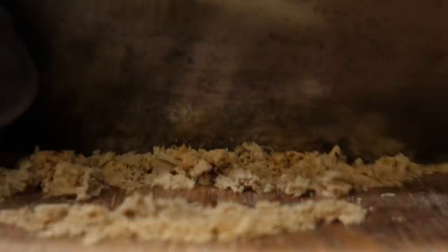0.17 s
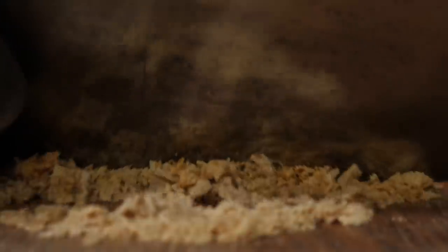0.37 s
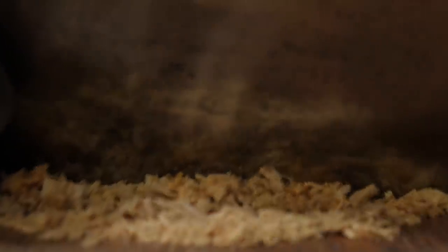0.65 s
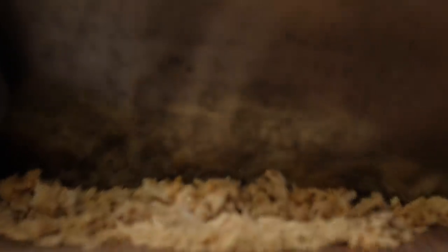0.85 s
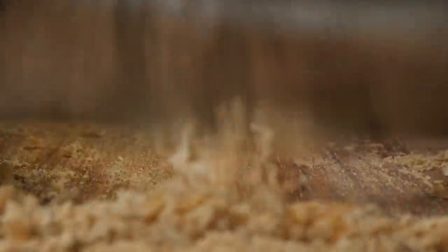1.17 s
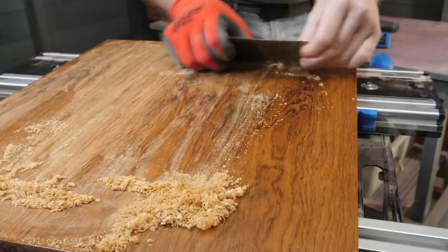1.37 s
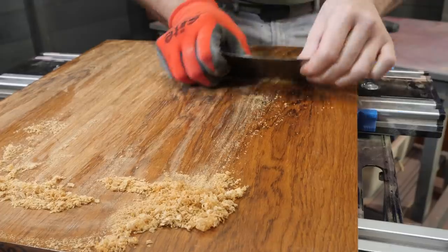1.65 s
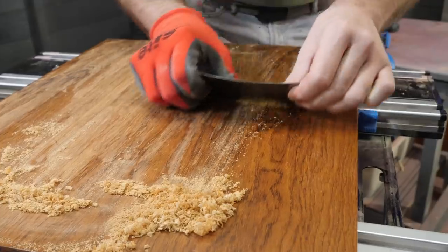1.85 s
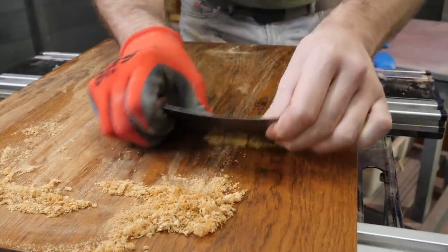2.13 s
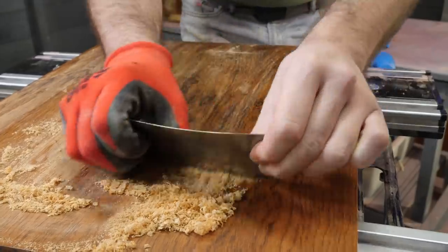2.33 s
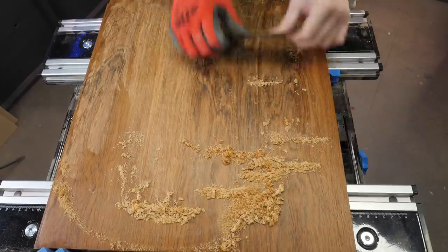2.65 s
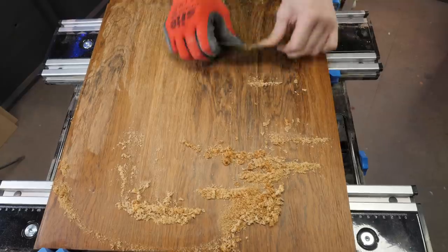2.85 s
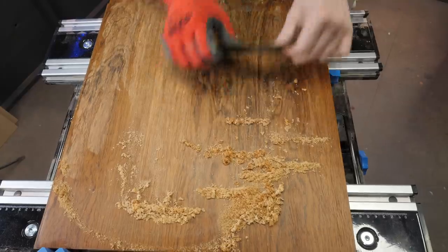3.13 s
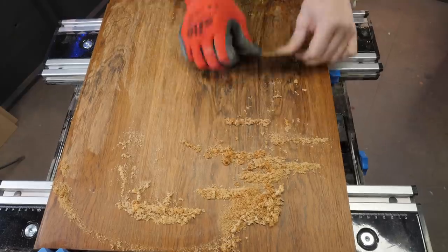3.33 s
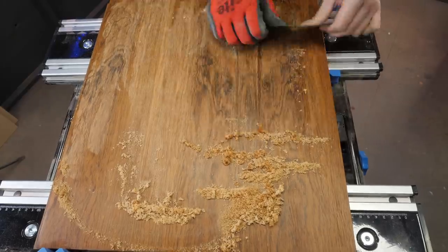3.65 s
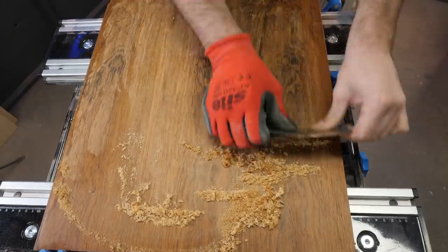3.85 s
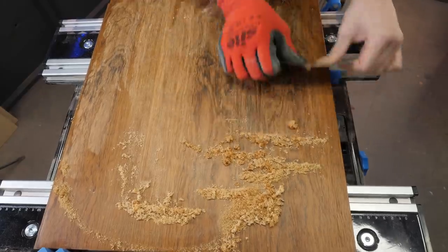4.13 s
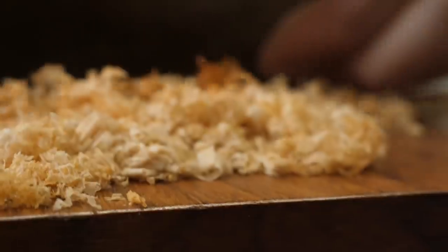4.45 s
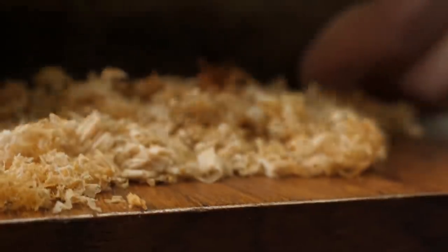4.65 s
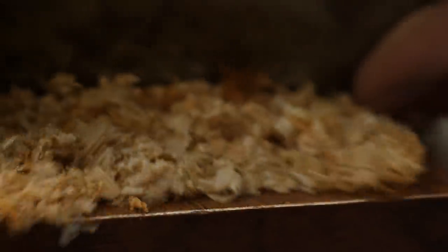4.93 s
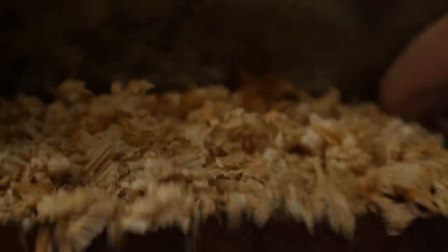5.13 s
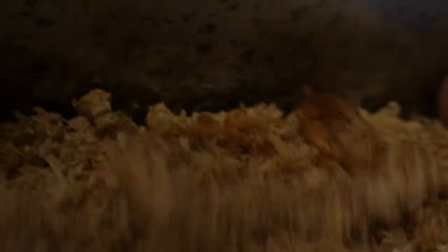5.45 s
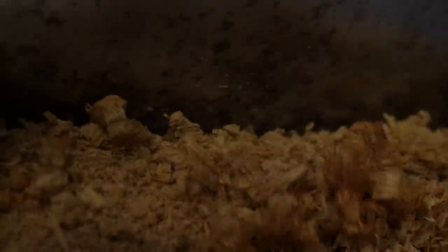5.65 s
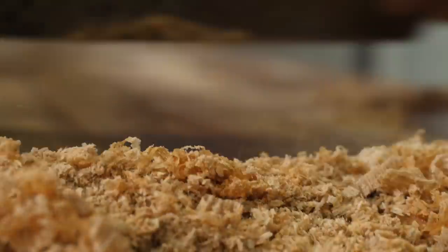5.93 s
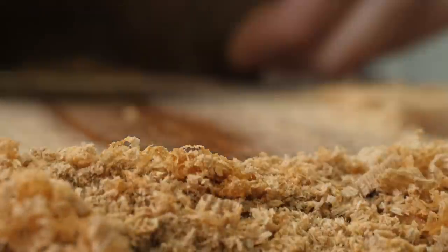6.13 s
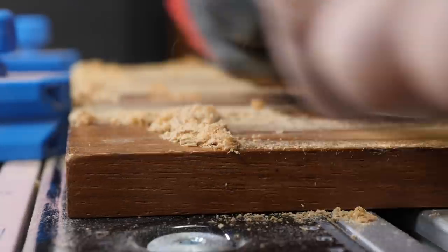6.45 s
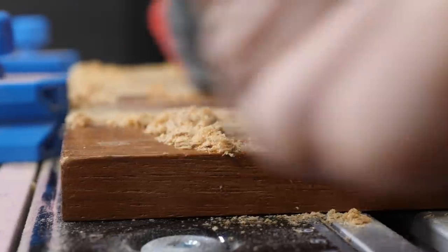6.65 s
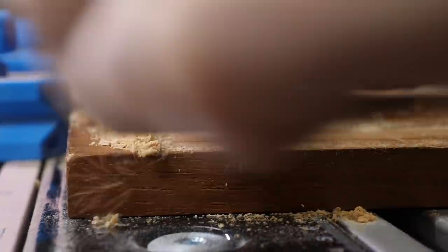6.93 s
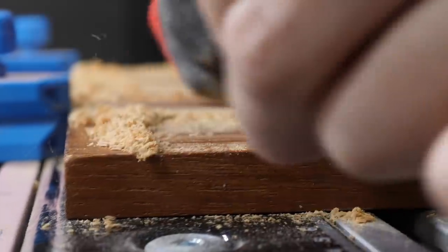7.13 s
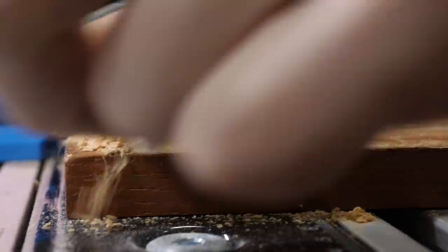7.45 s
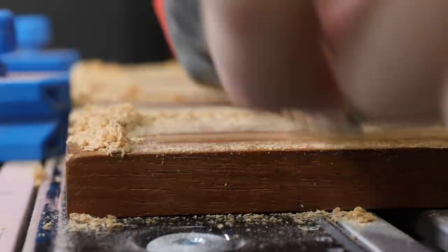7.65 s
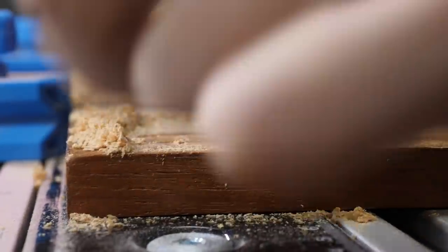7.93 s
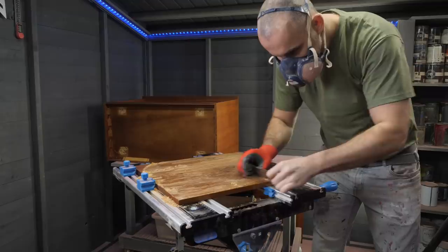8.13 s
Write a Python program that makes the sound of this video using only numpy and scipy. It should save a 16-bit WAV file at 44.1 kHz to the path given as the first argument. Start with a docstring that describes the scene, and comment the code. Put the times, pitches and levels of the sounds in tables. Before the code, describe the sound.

In a small workshop, a thin steel blade is dragged by hand across a clamped wooden panel. Close, metallic rasps stutter and catch at first, then comes one long, loud hissing stroke. Several lighter, drier quick strokes follow, smeared and slightly wide. Close ringing scrapes return over a low bench rumble, then spaced strokes, each led by a hard woody knock.

```python
"""A steel card scraper is drawn by hand along a clamped wooden panel: a dense rasp of tearing fibres, made of
flickering noise ringing in resonators, with catches that spray chips and gaps where the blade lifts.
Knocks of the blade are damped sines and noise bursts; the bench sways and drones as filtered noise.
Noise also makes the small workshop's air and the echo of its walls.
One channel is heard doubled; for a few quick strokes the two drift apart in phase."""
import sys
import numpy as np
from scipy import signal
from scipy.fft import rfft, irfft
from scipy.io import wavfile
from scipy.ndimage import uniform_filter1d, map_coordinates

SR = 44100
rng = np.random.default_rng(int(sys.argv[2]) if len(sys.argv) > 2 else 0)


def to_wav(s):
    """Save 16-bit WAV."""
    ch = np.atleast_2d(s).T  # columns
    pcm = np.round(np.clip(ch, -1, 1) * 32767)  # PCM
    wavfile.write(sys.argv[1], SR, pcm.astype(np.int16))


N = 365588


def amp(db):
    """Turns decibels into a gain."""
    return 10 ** (np.asarray(db) / 20)


def rms_one(x):
    """Levels a signal to an RMS of 1."""
    return x / np.sqrt(np.mean(x ** 2) + 1e-20)


def at_hz(points, hz):
    """Reads a curve of (frequency [Hz], value), interpolated over log frequency."""
    point_hz, values = np.array(points).T
    return np.interp(np.log(hz + 1), np.log(point_hz), values)


def in_time(rows, t):
    """Reads every column of a table whose first column is time [s]."""
    s, *columns = np.transpose(rows)
    return [np.interp(t, s, column) for column in columns]


def band(x, low_hz, high_hz, order=2):
    """Keeps the band between two frequencies."""
    return signal.sosfilt(signal.butter(order, [low_hz, high_hz], "band", fs=SR, output="sos"), x)


def coloured(x, spectrum):
    """Filters x with a spectrum of (frequency [Hz], level [dB per Hz])."""
    hz = np.arange(len(x) // 2 + 1) * SR / len(x)
    return irfft(rfft(x) * amp(at_hz(spectrum, hz)), len(x))


def drift(rate):
    """Slow chance at about `rate` changes a second, with an RMS of 1."""
    r = np.exp(-2 * np.pi * rate / SR)
    slow = signal.lfilter([1], [1, -2 * r, r * r], rng.standard_normal(N + SR))
    return rms_one(slow[SR:])   # the first second lets the filter settle


def resonance(x, hz, width_hz):
    """One resonance that rings at its own pitch, with a gain of 1 at its top."""
    r = np.exp(-np.pi * width_hz / SR)
    feedback = [1, -2 * r * np.cos(2 * np.pi * hz / SR), r * r]
    return signal.lfilter(np.array([1, 0, -1]) * (1 - r * r) / 2, feedback, x)


def tearing(grain_db):
    """Fibres break so densely that they merge to noise fluttering with the grain; two unrelated draws."""
    flutter_db = grain_db * drift(155) + 1.25 * drift(11.6)
    return rng.standard_normal((2, N)) * amp(flutter_db)


def patchy(x, depth_db):
    """Colour shifts in patches as the edge meets harder and softer grain."""
    _, _, z = signal.stft(x, SR, nperseg=512)
    patches = uniform_filter1d(rng.standard_normal(z.shape), size=5, axis=0)   # over frequency
    patches = uniform_filter1d(patches, size=24, axis=1)   # over time
    return signal.istft(z * amp(depth_db * rms_one(patches)), SR, nperseg=512)[1][:N]


def off_the_panel(x):
    """The panel mirrors the sound; the extra path changes as the blade travels, so the comb glides."""
    delay_ms = []   # shrinks along each stroke: (time [s], delay [ms])
    for *_, speed in STROKES:
        delay_ms += [(speed[0][0], 1.1), (speed[-1][0], 0.7)]
    delay, = in_time(delay_ms, np.arange(N) / SR)
    late = np.arange(N) - delay * SR / 1000
    return x + 0.13 * map_coordinates(x, [late], order=3, mode="nearest")


# Centres of the four layers, from low to high: wood, blade, shavings, edge hiss; (frequency [Hz])
LAYER_HZ = [500, 1900, 6000, 13000]


def layers(x):
    """Splits x into four overlapping layers by frequency, each levelled to an RMS of 1."""
    log_hz = np.log(np.arange(len(x) // 2 + 1) * SR / len(x) + 1)
    shares = [np.interp(log_hz, np.log(LAYER_HZ), row) for row in np.eye(4)]
    return [rms_one(irfft(rfft(x) * share, len(x))) for share in shares]


# Each way of holding and bending the blade: (start time [s], level of the room echo during this hold [dB],
# resonances as (frequency [Hz], width [Hz], level [dB]))
HOLDS = [ (0, -11, [(1173, 60, 1), (1556, 31, -1), (1760, 51, 4.5), (2310, 60, 4.5), (3180, 540, -2),
         (3720, 22, 4), (4360, 280, 0.5), (5840, 220, 3), (6500, 280, -1), (8470, 240, -0.5)]),
         (.78, -14, [(1130, 140, 2), (1470, 130, 1), (2420, 120, 5), (3360, 72, -4)]),
         (.97, -12, [(1600, 150, -1), (2470, 42, 11.5), (3280, 120, 6.5), (4900, 110, 2), (5800, 82, -4)]),
         (1.401, -12, [(1310, 160, -8), (1785, 79, -1.5), (2450, 220, -6), (2920, 82, 0), (3730, 260, -1.5),
         (4500, 88, 0.5), (5290, 230, -2), (6080, 120, 0.5), (8480, 1140, -2)]),
         (2.44, -24, [(1070, 410, -15), (2400, 160, -6.5), (5230, 960, -13), (8200, 580, -6.5),
         (13200, 1600, -8)]), (4.279, -10, [(1094, 120, -4.5), (1672, 85, 6.5), (2360, 54, 5.5),
         (2900, 50, 1.5), (3300, 73, -4), (3480, 71, -1), (5170, 140, -4.5), (5960, 180, -4),
         (8700, 400, -6)]), (5.14, -10.5, [(502, 27.4, 2), (1005, 75, -2.5), (2330, 45, -0.5),
         (2970, 190, -0.5), (4800, 130, -5.5), (5450, 100, -3), (6050, 170, -0.5), (8670, 290, -3)]),
         (5.95, -11.5, [(1194, 32, -1), (1640, 31, -2), (2990, 110, -4.5), (3720, 71, -3), (4350, 53, -12),
         (5560, 130, -3), (7860, 160, -2), (8760, 320, 0)]), ]
# Broad noise that fills in between the resonances: (frequency [Hz], level [dB per Hz])
BETWEEN_MODES = [(200, -11.5), (1000, -7.5), (2500, -8), (4000, -10), (9000, -8.5), (10500, -12.5),
                 (16000, -5)]
BEND_SHARE, BEND_RATE = 0.012, 2.5   # flexing by the thumbs: RMS slide as a share of pitch, changes per s


def rasp():
    """Tearing rings in each hold's resonances; they slide as the blade flexes and wander as contact moves."""
    ringing_source, broad_source = tearing(grain_db=1.0)
    broad_source = off_the_panel(patchy(broad_source, depth_db=2.5))
    wander = [amp(3.3 * drift(4.3)) for _ in range(7)]
    flex = BEND_SHARE * drift(BEND_RATE)
    out = np.zeros((4, N))
    starts = [round(hold[0] * SR) for hold in HOLDS] + [N]
    for (_, _, modes), a, b in zip(HOLDS, starts, starts[1:]):
        ringing = np.zeros(b - a)
        for k, (hz, width_hz, db) in enumerate(modes):
            driven = ringing_source[a:b] * wander[k % 7][a:b]
            ringing += (-1) ** k * amp(db) * resonance(driven, hz, width_hz)
        # reading at an uneven pace slides all pitches together
        pace = 1 + flex[a:b] - flex[a:b].mean()
        ringing = map_coordinates(ringing, [np.cumsum(pace)], order=3, mode="mirror")
        broad = band(coloured(broad_source[a:b], BETWEEN_MODES), 131, 18500)
        out[:, a:b] = layers(ringing + broad)
    return out


# Strokes of the scraper: (wood level [dB], blade level [dB], edge hiss level [dB], all at full speed;
# then the speed, heard as the level of the shavings: (time [s], level [dB]))
STROKES = [ (-34.5, -30, -33.5, [(0.0, -28), (0.336, -30.5), (0.368, -39), (0.402, -34.5), (0.462, -44.5),
           (0.594, -34), (0.632, -50), (0.642, -33), (0.7, -49.5)]), (-32, -25, -42, [(0.815, -30),
           (0.839, -34.5), (0.915, -40.5), (0.95, -58)]), (-39.5, -20, -28.5, [(0.99, -31), (0.996, -37.5),
           (1.088, -21.5), (1.16, -47)]), (-39, -25.5, -20, [(1.52, -38.5), (1.624, -28), (2.036, -23),
           (2.124, -24.5), (2.188, -22), (2.324, -23.5), (2.402, -30.5), (2.42, -38)]),
           (-44.5, -36.5, -33, [(2.45, -33.5), (2.606, -34.5), (2.63, -38), (2.655, -59)]),
           (-40, -38, -31.5, [(2.78, -42), (2.99, -33), (3.1, -35), (3.12, -50)]),
           (-42, -39.5, -27, [(3.275, -41.5), (3.499, -29), (3.519, -36), (3.535, -52)]),
           (-53.5, -32, -25.5, [(3.685, -38), (3.919, -28.5), (3.945, -49)]),
           (-46.5, -35.5, -31, [(4.085, -46), (4.141, -41), (4.275, -34)]), (-35, -33, -37, [(4.285, -33.5),
           (4.305, -34), (4.35, -58)]), (-35, -25.5, -27, [(4.39, -34.5), (4.456, -27.5), (4.794, -28),
           (4.9, -32), (4.93, -26.5), (5.034, -30), (5.074, -46), (5.137, -43)]),
           (-34, -27, -37, [(5.14, -60), (5.196, -28.5), (5.302, -37), (5.318, -49), (5.352, -32),
           (5.606, -37.5), (5.65, -61)]), (-38.5, -33, -39.5, [(5.705, -40), (5.757, -41), (5.8, -61.5)]),
           (-38.5, -27.5, -28.5, [(6.2, -51), (6.21, -31), (6.266, -27), (6.32, -30), (6.39, -53)]),
           (-36.5, -27, -27, [(6.62, -44), (6.714, -41), (6.736, -36.5), (6.876, -26.5), (6.96, -49.5)]),
           (-54, -55, -62, [(7.1, -70), (7.106, -63), (7.13, -56)]), (-37, -31, -30.5, [(7.16, -55),
           (7.182, -58), (7.248, -40), (7.45, -31.5), (7.52, -57.5)]), (-44, -41, -40.5, [(7.78, -44),
           (7.814, -46.5), (7.896, -39), (7.93, -55)]), (-53, -51, -51, [(8.075, -52), (8.11, -50)]),
           (-46.5, -31.5, -34, [(8.13, -40.5), (8.27, -31.5), (8.29, -35)]), ]
# The edge catches and breaks free: (time [s], level at the start of the chip spray [dB])
CATCHES = [(0.3594, -38), (0.4135, -33), (0.474, -36), (0.5367, -39), (0.555, -30), (0.618, -37),
           (0.6395, -29), (0.6589, -30), (0.8929, -27.5), (0.9173, -32), (5.124, -31.5), (5.164, -30),
           (5.1794, -32), (5.255, -33), (5.309, -32), (5.508, -36)]
WOOD_FOLLOWS, BLADE_FOLLOWS, HISS_FOLLOWS = 0.26, 0.51, 1.38   # dB lost per dB that the shavings lose
TOUCH_S, LIFT_S = 0.008, 0.013   # fades as the blade lands and leaves
# judder depth [dB]: base, growth per dB that the blade outsings the shavings, least and most
JUDDER_DB, JUDDER_PER_DB, JUDDER_LEAST_DB, JUDDER_TOP_DB = 1, 0.33, 1, 6
SPRAY_S = 0.0042   # time constant of a spray of chips


def strokes():
    """One speed curve a stroke drives all four layers: slowing dulls the treble most and makes it judder."""
    gain, t, shake = np.zeros((4, N)), np.arange(N) / SR, drift(84)
    for wood_db, blade_db, hiss_db, speed in STROKES:
        landing = np.clip((t - speed[0][0]) / TOUCH_S + 1, 0, 1)
        lifting = np.clip((speed[-1][0] - t) / LIFT_S + 1, 0, 1)
        touch = landing * lifting
        on = touch > 0
        shavings, = in_time(speed, t[on])
        loss = shavings - shavings.max()
        wood = wood_db + WOOD_FOLLOWS * loss
        blade = blade_db + BLADE_FOLLOWS * loss
        hiss = hiss_db + HISS_FOLLOWS * loss
        depth_db = JUDDER_DB + JUDDER_PER_DB * (blade - shavings)
        judder = np.clip(depth_db, JUDDER_LEAST_DB, JUDDER_TOP_DB) * shake[on]
        gain[:, on] += touch[on] * amp([wood, blade, shavings + 0.66 * judder, hiss + judder])
    decay = np.exp(-np.arange(1300) / SR / SPRAY_S)
    for s, db in CATCHES:
        i = round(s * SR)
        # chips sound in the blade, shavings and hiss layers
        gain[1:, i:i + 1300] += amp(db) * decay * amp([[-3], [0], [-5]])
    return (gain * rasp()).sum(axis=0)


# Echo decay of the workshop: (frequency [Hz], time to fall 60 dB [s])
ROOM_T60 = [(200, 0.44), (1500, 0.39), (5000, 0.28), (14000, 0.13)]


def room(x):
    """Echo of the workshop walls: noise that dies at its own pace in each octave."""
    t = np.arange(SR // 2) / SR
    edges = 150 * 2.0 ** np.arange(8)
    echo = np.zeros(len(t))
    for low, high in zip(edges, edges[1:]):
        t60 = at_hz(ROOM_T60, np.sqrt(low * high))
        echo += band(rng.standard_normal(len(t)), low, high) * amp(-60 * t / t60)
    echo *= np.clip(t / 0.011, 0, 1)   # the echo swells in over 11 ms
    return signal.fftconvolve(x, echo / np.sqrt(np.sum(echo ** 2)))[:N]


# Bench shaken by the work: (time [s], sway level [dB], drone level [dB])
RUMBLE = [(0.0, -45.5, -42), (0.88, -35.5, -39), (0.97, -37.5, -50), (1.22, -39, -40), (1.38, -49, -68),
          (1.75, -41, -51.5), (3.74, -50, -54.5), (4.15, -51, -73), (4.36, -33.5, -40), (5.4, -44, -34),
          (5.91, -44, -52), (8.29, -50, -55)]


def bench():
    """Sway of the bench, coming in lurches, and the drone of its lowest resonances."""
    sway_db, drone_db = in_time(RUMBLE, np.arange(N) / SR)
    lurch_db = 2.0 * drift(10.4) + 2.5 * drift(3.0)
    sway_source, drone_source = rng.standard_normal((2, N)) * amp(lurch_db)
    sway = band(sway_source, 16, 84)
    drone = band(drone_source, 93, 178) + amp(1.5) * resonance(drone_source, 122.0, 25)
    return amp(sway_db) * rms_one(sway) + amp(drone_db) * rms_one(drone)


# Spectrum of the workshop air: (frequency [Hz], relative level [dB per Hz])
AIR_SPECTRUM = [(88, -40), (150, -11.5), (414, -3), (601, -0.5), (759, -5), (1080, -3), (1870, -8),
                (2500, -14.5), (6510, -22.5), (16000, -44.5)]
AIR_DB = -43.5   # RMS level


def workshop_air():
    """Steady background of the workshop: noise with a fixed spectrum."""
    return amp(AIR_DB) * rms_one(coloured(rng.standard_normal(N), AIR_SPECTRUM))


def struck(modes, t, share, chance):
    """Damped sines, each with a strength and phase of its own; peak 1."""
    x = np.zeros(len(t))
    for (hz, db, t60), (strength, phase) in zip(modes, chance):
        decay_db = -60 * t / (t60 * share)
        x += amp(db + 2.9 * strength + decay_db) * np.sin(2 * np.pi * hz * t + phase)
    return x / np.abs(x).max()


# Blade set down or knocked on the panel:
# (time [s], ring level [dB], thud level [dB], body level [dB], crack level [dB])
KNOCKS = [(0.754, -25.5, -29, -26.5, -43), (0.81, -29, -15.5, -26, -7.5), (0.985, -13, -43, -34, -14),
          (1.142, -36, -40, -33, -6), (1.171, -12, -27, -16.5, -26), (1.455, -15, -52, -31, -19),
          (1.52, -26, -50, -40, -22), (2.437, -21, -29, -22, -19), (2.758, -16, -38, -24, -12),
          (3.254, -15, -26, -19.5, -7), (3.667, -14, -30, -26, -11), (4.061, -9.5, -36, -27, -11),
          (4.388, -27.5, -23, -36, -23), (5.698, -17.5, -35, -34, -23), (5.83, -15.5, -25, -21, -41),
          (6.18, -9, -42, -18, -1.5), (6.591, -2, -31, -11, -11), (7.138, -10, -34, -15.5, -33),
          (7.742, 0.5, -39, -12, -13), (8.128, -24.5, -46, -32, -43)]
# Modes of the panel, ringing freely: (frequency [Hz], level [dB], time to fall 60 dB [s])
PANEL = [(591, 6, 0.17), (626, -9, 0.11), (807, -22, 0.04), (1008, -12.5, 0.16), (1059, 12.5, 0.11),
         (1186, 1, 0.23), (1352, 1.5, 0.21), (1620, -15, 0.2), (1650, 8, 0.096), (1870, -13, 0.047),
         (2400, -34, 0.031)]
# Modes of the bench, ringing freely: (frequency [Hz], level [dB], time to fall 60 dB [s])
BENCH = [(50, -6.5, 0.24), (127.4, 0, 0.15)]
CONTACT_S = 0.002   # build-up of the contact
HAND_DAMPING, BENCH_DAMPING = 0.31, 0.87   # share of the free decay left: panel under the hands, bench
SMEAR_FROM_S, SMEAR_TO_S = 2.6, 4.2   # knocks between these times are smeared into a short swell


def knocks():
    """Contact builds up over 2 ms, rings in panel and bench and adds a bright crack of steel; some are smeared."""
    out, t = np.zeros(N + SR), np.arange(SR // 2) / SR
    chance = rng.standard_normal((len(KNOCKS), len(PANEL), 2))
    for (s, ring_db, thud_db, body_db, crack_db), luck in zip(KNOCKS, chance):
        noise = rng.standard_normal((3, len(t)))
        # the many small modes of the panel
        dense = rms_one(band(noise[0], 720, 1930)) * amp(-6.0 - 60 * t / 0.071)
        ring = struck(PANEL, t, HAND_DAMPING, luck) + dense
        thud = struck(BENCH, t, BENCH_DAMPING, luck)
        body = rms_one(band(noise[1], 260, 760)) * amp(-60 * t / 0.053)
        crack = rms_one(band(noise[2], 1600, 6550)) * np.exp(-t / 0.0018)
        hit = amp(ring_db) * ring + amp(thud_db) * thud
        hit += amp(body_db) * body + amp(crack_db) * crack
        hit *= np.clip(t / CONTACT_S, 0, 1) ** 1.53
        i = round(s * SR)
        if SMEAR_FROM_S < s < SMEAR_TO_S:
            swell = noise[2, :600] * np.hanning(600) ** 1.4   # a noise burst of about 14 ms smears the hit
            spread = np.convolve(hit, swell)[:len(t)]
            hit = rms_one(spread) * np.sqrt(np.mean(hit ** 2))   # keep the level of the sharp hit
            i -= 280   # centre the swell near the knock
        out[i:i + len(t)] += hit
    return out[:N]


def scene():
    """Work at the panel, its echo at the level set for each hold, bench and air, in two equal channels."""
    work = strokes() + knocks()
    hold = np.searchsorted([h[0] for h in HOLDS], np.arange(N) / SR, "right") - 1
    wet = amp(np.array([h[1] for h in HOLDS])[hold])
    mono = work + wet * room(work) + bench() + workshop_air()
    return np.array([mono, mono])


# How far the channels have drifted apart: (time [s], share of full drift)
APART = [(2.45, 0), (2.7, 0), (3.0, 0.91), (4.26, 0.93), (4.3, 0)]
# Largest phase between the channels at full drift: (frequency [Hz], phase [radians])
APART_TURN = [(60, 2.7), (800, 2.37), (2500, 2.87), (5500, 1.6), (12000, 1.6)]


def phases_apart(x):
    """Turns left forward and right back in phase, or the reverse, in broad slow patches of chance."""
    hz, t, z = signal.stft(x, SR, nperseg=512)
    patches = uniform_filter1d(rng.standard_normal(z.shape[1:]), size=24, axis=0)   # over frequency
    patches = uniform_filter1d(patches, size=60, axis=1)   # over time
    share, = in_time(APART, t)
    largest = np.clip(at_hz(APART_TURN, hz)[:, None] * share, 0, 2.9)
    turn = largest * np.tanh(4.1 * rms_one(patches))
    turned = z * np.exp(0.5j * np.array([turn, -turn]))
    return signal.istft(turned, SR, nperseg=512)[1][:, :N]


CUTOFF_HZ = 16350   # from here up the treble is at least 90 dB down


def record(dry):
    """Peaks are rounded, the channels drift, the top is cut."""
    rounded = 0.76 * np.tanh(dry / 1.058)
    x = phases_apart(rounded)
    return signal.sosfilt(signal.cheby2(28, 90, CUTOFF_HZ, fs=SR, output="sos"), x)


dry = scene()
out = record(dry)
to_wav(out)
```